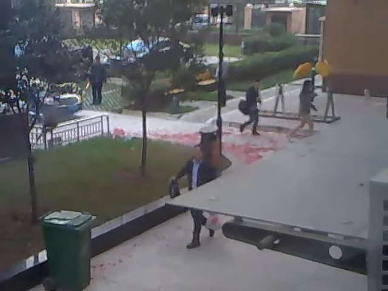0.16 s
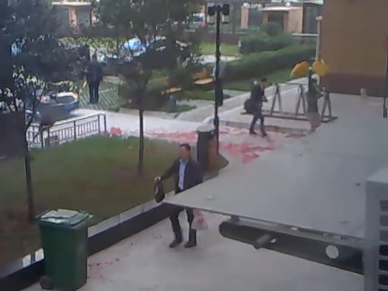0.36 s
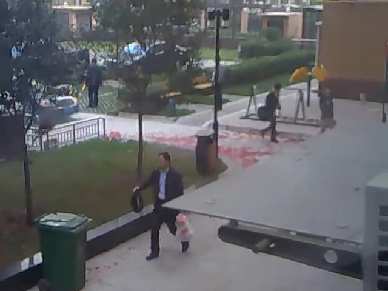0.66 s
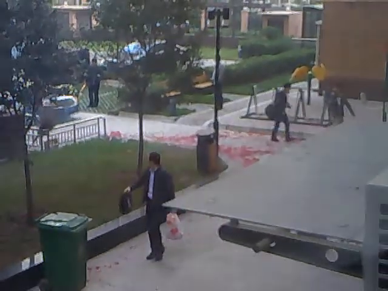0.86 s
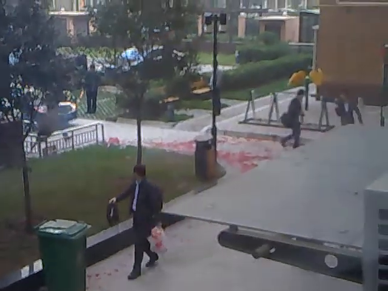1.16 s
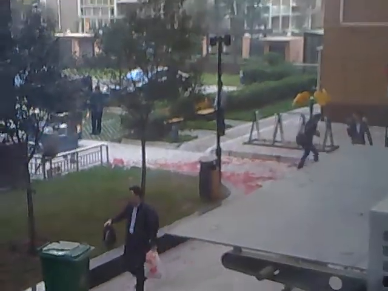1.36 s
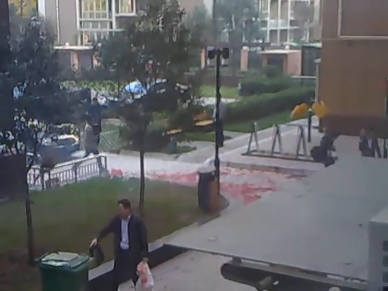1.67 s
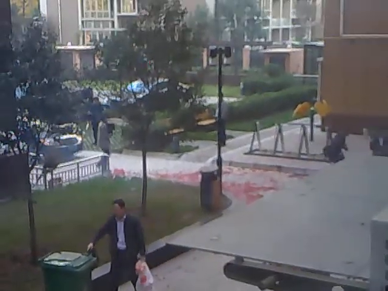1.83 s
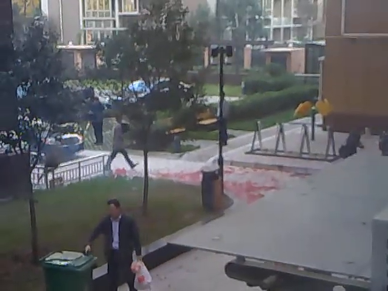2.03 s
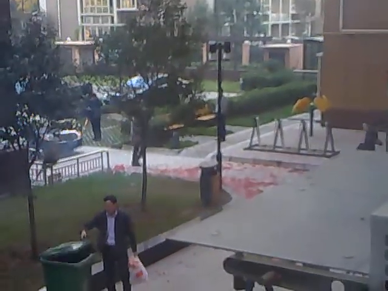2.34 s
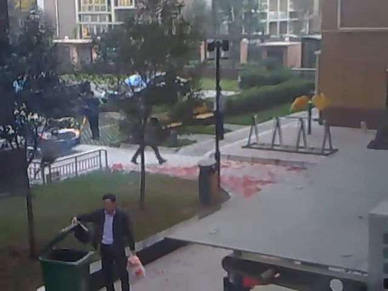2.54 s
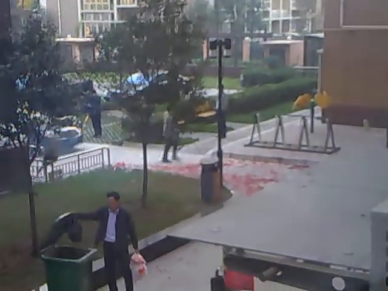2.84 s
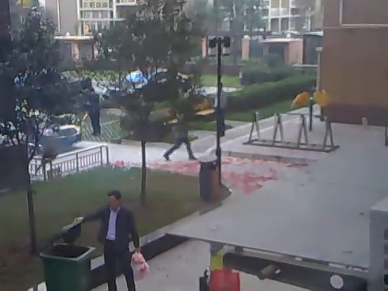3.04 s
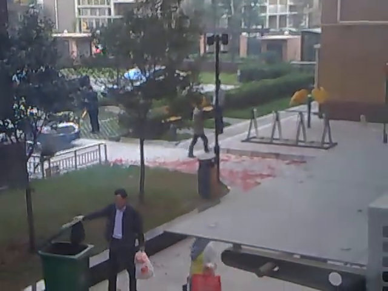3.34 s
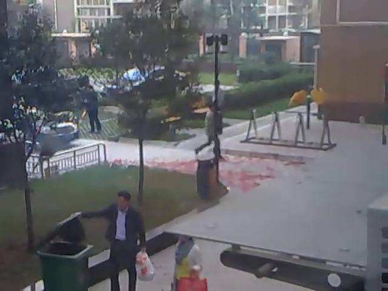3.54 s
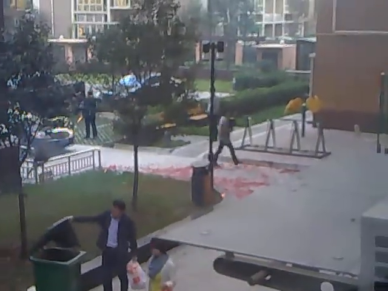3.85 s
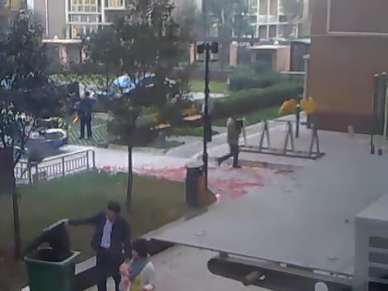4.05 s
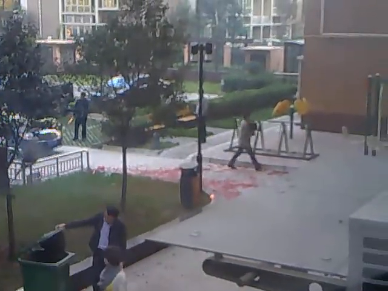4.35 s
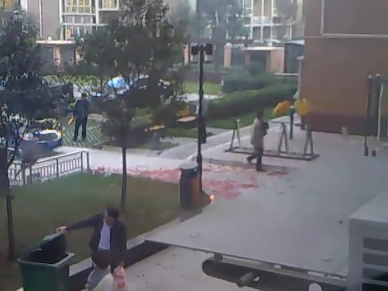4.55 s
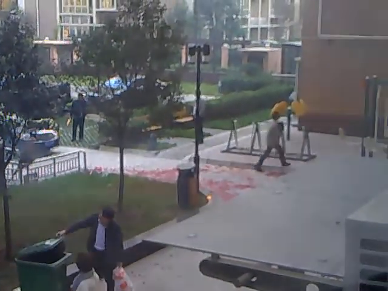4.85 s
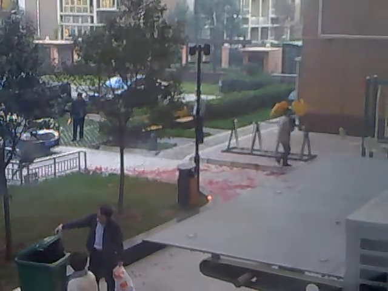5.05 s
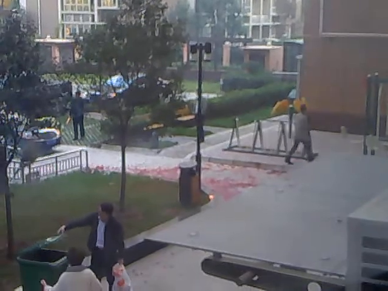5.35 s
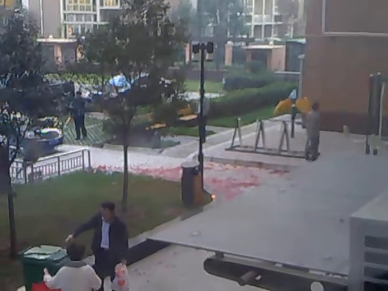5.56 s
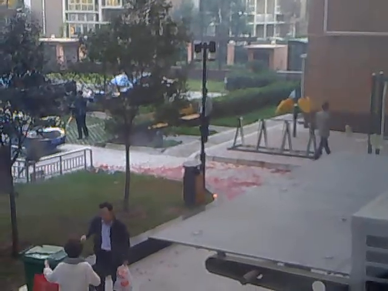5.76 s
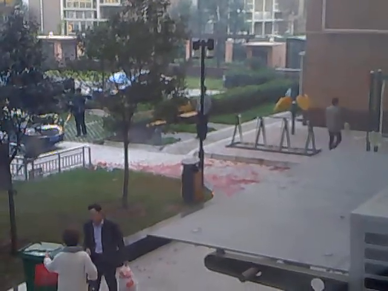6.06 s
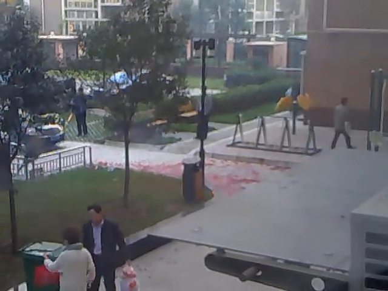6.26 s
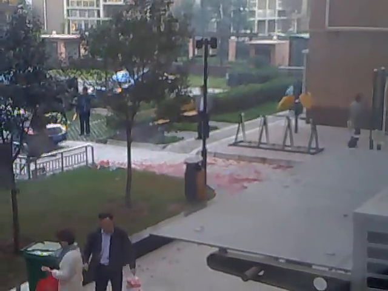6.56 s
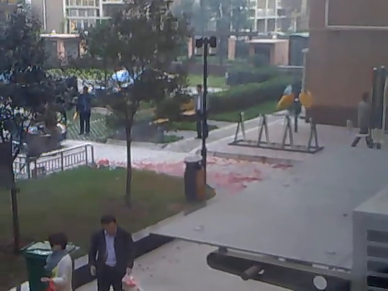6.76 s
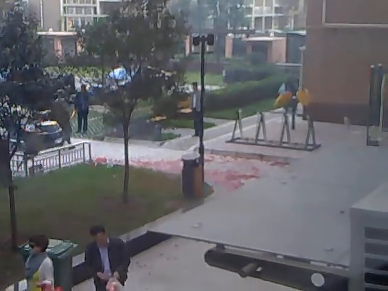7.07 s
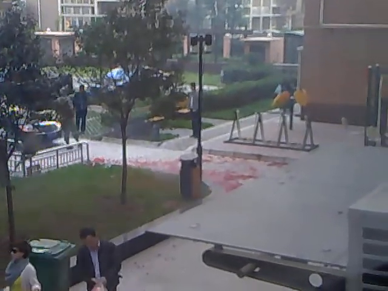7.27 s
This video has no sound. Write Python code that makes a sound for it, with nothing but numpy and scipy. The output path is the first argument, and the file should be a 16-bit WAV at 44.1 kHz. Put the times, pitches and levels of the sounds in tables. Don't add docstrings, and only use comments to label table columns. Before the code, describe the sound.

Two huge firecrackers explode in a hard-walled courtyard, each with crackling slapback echoes and a long fading roar, then a bin lid rattles close by.

```python
import sys
import numpy as np
from scipy import signal
from scipy.io import wavfile
from scipy.ndimage import uniform_filter1d

SR = 44100
rng = np.random.default_rng(int(sys.argv[2]) if len(sys.argv) > 2 else 0)


def transcribe(signal):
    frames = np.atleast_2d(signal).T
    limited = np.clip(frames, -1, 1)
    pcm = np.round(limited * 32767).astype(np.int16)
    wavfile.write(sys.argv[1], SR, pcm)


def volts_from_decibels(level):
    exponent = np.asarray(level, float) / 20
    return 10 ** exponent


N = 326340


def evened(x):
    return x / np.sqrt(np.mean(x ** 2) + 1e-20)


def read(points, hz):
    f, value = np.transpose(points)
    return np.interp(np.log(hz + 1), np.log(f + 1), value)


def add(mix, s, sound):
    part = mix[round(s * SR):][:len(sound)]
    part += sound[:len(part)]


def causal(points, tilt_db=0, size=4096):
    hz = abs(np.fft.fftfreq(size, 1 / SR))
    octaves_up = np.clip(np.log2(hz / 2000 + 1e-9), 0, 2)
    log_gain = np.log(volts_from_decibels(np.maximum(read(points, hz) + tilt_db * octaves_up, -100)))
    h = np.fft.ifft(np.exp(np.conj(signal.hilbert(log_gain)))).real[:size // 2]
    return h / abs(h).max()


def noise(points, count, patchy_db, flicker_db, colour_db=None, size=512):
    hop = size // 4
    frames, hz = count // hop + 5, np.fft.rfftfreq(size, 1 / SR)
    a, b, patches = rng.standard_normal((frames, len(hz), 3)).T
    patches = uniform_filter1d(patches, size=5, axis=0)
    patches = evened(uniform_filter1d(patches, size=12, axis=1))
    flicker = evened(uniform_filter1d(rng.standard_normal(frames), size=3))
    z = (a + 1j * b) * volts_from_decibels(read(points, hz)[:, None] + patchy_db * patches + flicker_db * flicker)
    level = np.sqrt(np.mean(signal.istft(z, nperseg=size, noverlap=size - hop)[1] ** 2))
    if colour_db:
        z = z * volts_from_decibels(colour_db(hz[:, None], np.arange(frames) * hop / SR))
    return signal.istft(z, nperseg=size, noverlap=size - hop)[1][:count] / level


# frequency in Hz, level in dB.
BLAST = [(24, -76.5), (45, -41.5), (140, -17.5), (175, -11), (300, -7.5), (410, -4.5), (480, -10), (680, 1),
         (1010, -2), (1540, -0.5), (2030, -9), (4400, -30), (6100, -46.5), (8200, -66), (15700, -83)]
# start in seconds, blast level in dB, stretch of the echo paths as a factor,
# share of the echo loss from 0 to 1.
BANGS = [
    (1.1658, -3, 1.0, 1.0),
    (3.8232, -3, 1.062, .55),
]
# delay in seconds, dB relative to the blast.
WALLS = [(0, 0), (.0039, -9), (.0097, -1), (.0137, -6), (.0307, -8), (.0492, -2), (.0567, -6), (.0600, -6),
         (.0642, -4), (.1292, -6), (.1852, -9)]
# start in seconds, peak in dB.
STRAYS = [
    (2.012, -38),
    (2.11, -44),
    (2.32, -58),
    (3.8435, -5),
    (3.8995, -5),
    (3.921, -5),
]


def slaps():
    bright_db, dull_db, dull_s = 2, 7, .08
    thump_hz, thump_db = 205, -20.5
    out, t = np.zeros(N), np.arange(400) / SR
    port_rise = np.sin(np.pi / 2 * np.minimum(t / .0012, 1)) ** 2
    port = 3 * port_rise * volts_from_decibels(-60 * t / .014) * np.sin(2 * np.pi * 1400 * t)
    thump = volts_from_decibels(thump_db) * np.sin(2 * np.pi * thump_hz * t) * np.sin(np.pi * t / t[-1])
    fade = np.cos(np.linspace(0, np.pi / 2, 900))
    rows = [(s + stretch * delay, db + share * loss_db, delay)
            for s, db, stretch, share in BANGS for delay, loss_db in WALLS]
    rows += [(s, db, dull_s) for s, db in STRAYS]
    for (s, db, delay), scatter in zip(rows, rng.standard_normal((len(rows), len(t)))):
        fronts = scatter * np.minimum(t / .001, 1) * volts_from_decibels(-60 * t / .012)
        tilt_db = bright_db - dull_db * delay / (delay + dull_s) - 2
        slap = evened(signal.fftconvolve(fronts, causal(BLAST, tilt_db))[:900]) * fade
        slap[:len(t)] += 6.5 * port
        slap[:len(t)] += abs(slap).max() * thump
        add(out, s, volts_from_decibels(db - 1) * slap / abs(slap).max())
    return out


# frequency in Hz, dB after a second.
LOSS = [(60, 2.5), (200, 10), (500, 2.5), (1500, -2.5), (2100, 15.5), (3000, 13), (4200, 26.5),
        (6000, 19.5), (14000, 24.5)]
# frequency in Hz, level in dB.
SPARKLE = [(2000, 0.4), (3000, 5), (4200, 7.5), (6000, 25.5), (8500, 29), (15000, 18.5)]


def roar_colour(hz, age, boom_db, fading):
    most_loss_db, loss_power, crack_db, crack_s = 27, 1.6, 6.5, 0.017
    bass = 1 / (1 + (hz / 200) ** 3)
    sparkle = read(SPARKLE, hz) * np.exp(-age / 0.097)
    loss = most_loss_db * np.tanh(read(LOSS, hz) * fading * age ** loss_power / most_loss_db)
    crack = crack_db * np.exp(-age / crack_s) / (1 + (9000 / (hz + 1)) ** 4)
    return sparkle - loss + crack + bass * (boom_db + 3 * np.exp(-age / .08))


# level in dB, hold in seconds, decay in dB per second, length in seconds.
ROAR = [
    (-17.5, 0.088, 36, 1.2),
    (-13, 0.14, 32, 1.78),
]
# bass below 200 Hz in dB, dulling speed as a factor on the loss,
# seconds after which the suppressor bites.
ROAR_COLOUR = [
    (.5, 1, 0.82),
    (2.5, .6, 1.36),
]
LULL_DB = [5.5, 1.5]


def roars():
    far_wall_s, bite_db_per_s = .049, 18.5
    out = np.zeros(N)
    for (s, *_), (db, hold, fall, length), (boom_db, fading, bite), lull_db in zip(
            BANGS, ROAR, ROAR_COLOUR, LULL_DB):
        t = np.arange(0, length, 1 / SR)
        echoes = noise(BLAST, count=len(t), patchy_db=1.1, flicker_db=1.1, size=1024,
                       colour_db=lambda hz, age: roar_colour(hz, age, boom_db, fading))
        lull = np.interp(t / far_wall_s, [0, .35, .9, 1.05], [-.3, .8, 1, 0])
        knee = np.hypot(t - hold, .05) + t - hold
        level_db = db - lull_db * lull - fall * knee / 2 - bite_db_per_s * np.maximum(t - bite, 0)
        ends = np.minimum(1, np.minimum(t / .003, (length - t) / .1))
        add(out, s + .001, volts_from_decibels(level_db) * echoes * ends)
    return out


# start in seconds, time to the main crest in seconds, level in dB.
KNOCK = (.3076, .0023, -7)


def knock():
    s, crest, db = KNOCK
    u = np.arange(1, 1800) / SR / crest
    swing = np.cos(2 * np.pi * np.log2(u))
    swing = swing * u ** 1.5 * np.exp(-(u / 1.4) ** 4) * np.minimum(u / .24, 1) ** 4
    push = .6 * np.exp(-((u - 1) / .25) ** 2)
    creep = -.15 * np.exp(-((u - 2.3) / .75) ** 4) + .03 * np.exp(-((u - 5.8) / 2.5) ** 2)
    motion = uniform_filter1d(swing + push + creep, size=4)
    out = np.zeros(N)
    add(out, s, volts_from_decibels(db) * signal.lfilter(*signal.iirnotch(3180, 6, SR), motion))
    return out


# start in seconds, peak in dB,
# frequency in Hz, length in cycles, hollow overtone in relative dB.
BUMPS = [(0.004, -57, 240, 1.5, -16), (0.268, -45.5, 95.5, 0.71, -8), (0.379, -51, 251, 3.5, -18),
         (0.488, -52.5, 180, 0.84, -5.5), (0.829, -72.5, 62, 1.4, -13.5), (0.874, -68.5, 61.9, 1.4, -10),
         (2.929, -56, 102.5, 0.78, -17.5), (3.08, -50.5, 180, 1.7, -14.5), (3.531, -36.5, 56, 1, -3),
         (5.452, -47.5, 172.6, 1.8, -12), (5.71, -50, 185, 1.1, -6), (6.038, -40.5, 154, 1.7, -2.5),
         (6.309, -42.5, 117, 3.3, -21), (6.479, -38.5, 183, 1.9, -20), (6.745, -44.5, 210, 1.7, 5),
         (6.829, -39, 214, 1.6, -10), (7.127, -34, 100, 0.96, -19), (7.238, -38.5, 194, 0.79, -6.5)]
THUDS = [
    (.646, -50, 75, 1.1, -4),
    (.648, -54, 220, 1.2, -20),
    (6.008, -40, 62, 1.1, -7),
    (6.02, -45, 260, 2.5, -6),
    (5.41, -57, 180, 9, -30),
]
# frequency in Hz, t60 in seconds.
HOLLOW = (440, .04)


def bumps():
    out, t = np.zeros(N), np.arange(9000) / SR
    hollow_hz, hollow_t60 = HOLLOW
    hollow = np.minimum(t / .008, 1) * volts_from_decibels(-60 * t / hollow_t60) * np.sin(2 * np.pi * hollow_hz * t)
    for s, db, hz, cycles, hollow_db in list(BUMPS) + list(THUDS):
        u = t * hz / cycles
        bump = 5.4 * u * np.exp(-2 * u) * np.sin(2 * np.pi * hz * t)
        add(out, s, volts_from_decibels(db) * (bump + volts_from_decibels(hollow_db + 6) * hollow))
    return out


# start in seconds, peak in dB, t60 in seconds.
RATTLES = [(2.9628, -56, 0.1), (3.5399, -54, 0.13), (5.6333, -55, 0.24), (5.6977, -34, 0.11),
           (5.711, -39, 0.08), (5.7658, -26.5, 0.18), (5.8005, -52, 0.18), (5.831, -43, 0.52),
           (5.9412, -48.5, 0.71), (6.0873, -45.5, 0.21), (6.1133, -68, 0.19), (6.2556, -57, 0.13),
           (6.2984, -56, 0.24), (6.41, -56, 0.11), (6.7064, -47, 0.14), (6.7515, -42, 0.15),
           (6.818, -42, 0.35), (7.1566, -63, 0.12), (7.2961, -33, 0.042)]
# frequency in Hz, level in dB.
RATTLE = [(180, -44.5), (300, -6), (434, -16), (937, -3.5), (1060, -11), (1240, 2.5), (1910, -12),
          (2840, -23.5), (4000, -25), (9000, -43), (11700, -83), (19800, -120)]
# start in seconds, level in dB.
TICKS = [
    (2.966, -77),
    (3.14, -79),
    (6.112, -66),
    (6.252, -63),
]


def rattles():
    out, t = np.zeros(N), np.arange(9000) / SR
    for (s, db, t60), grit in zip(RATTLES, rng.standard_normal((len(RATTLES), len(t)))):
        shake = evened(signal.fftconvolve(grit, causal(RATTLE, -8))[:len(t)])
        add(out, s, volts_from_decibels(db - 10 - 60 * t / t60) * np.minimum(t / 0.0053, 1) ** 1.4 * shake)
    for (s, db), grit in zip(TICKS, rng.standard_normal((len(TICKS), len(t)))):
        crackle = evened(signal.lfilter(*signal.iirpeak(2500, 3.5, SR), grit))
        add(out, s, volts_from_decibels(db - 60 * t / .11) * np.minimum(t / 0.0046, 1) * crackle)
    return out


# start in seconds, end in seconds, pitch in Hz, lowest multiple,
# highest multiple, level in dB.
DRONES = [
    (.93, 1.17, 229, 3, 7, -78),
    (3.45, 3.8, 549, 1, 2, -50.5),
    (3.62, 3.72, 1610, 1, 1, -56),
    (7.3, 7.4, 865, 1, 1, -59),
]


def drones():
    out = np.zeros(N)
    for start, end, hz, low, high, db in DRONES:
        t = np.arange(0, end - start, 1 / SR)
        drift, waver = uniform_filter1d(rng.standard_normal((2, len(t))), size=1200, axis=1)
        turns = hz * (t + .00008 * evened(drift))
        multiples = range(round(low), round(high) + 1)
        hum = sum(np.sin(2 * np.pi * k * turns + k * k) / np.sqrt(k) for k in multiples)
        add(out, start, volts_from_decibels(db + 2.5 * evened(waver)) * hum * signal.windows.tukey(len(t), .6))
    return out


# frequency in Hz, width in Hz, share.
RECESS = [(182.3, 4, 1), (234, 4.9, 0.23), (323, 27, 0.37), (713.3, 19, 0.45), (1166, 14, 0.76),
          (1226, 14, 0.93), (1710, 30, 0.25), (1787, 41, 0.62)]


def recess(x):
    out = x.copy()
    for hz, width, share in RECESS:
        out += share * signal.lfilter(*signal.iirpeak(hz, hz / width, SR), x)
    return out


# time in seconds, gain in dB.
GATE = [(0, -24), (1.0, -29.5), (1.14, -28), (1.17, -6), (1.42, -22), (2.1, -36.5), (2.6, -56), (2.84, -30),
        (3.71, 1), (3.9, 4.2), (4.12, -9), (4.37, -12.5), (5.05, -16), (5.59, -25), (6.43, -0.06),
        (7.4, -1)]
OPEN_DB = {"circuit": -72, "rumble": -48, "street": -53.5}


def suppressor_db(t):
    return np.interp(t, *np.transpose(GATE))


# frequency in Hz, level in dB.
RUMBLE = [(8.8, -32.5), (15, -10), (54, -4), (86, 0), (150, -7.5), (190, -2), (313, -10), (458, -17.5),
          (500, -16.5), (650, -53), (1100, -120)]
# frequency in Hz, level in dB.
STREET = [(180, -28), (300, -10.5), (459, -11.5), (589, -9), (708, -1), (1050, -7), (1230, -4),
          (1740, -11.5), (2020, -30), (2200, -30), (2860, -48), (4840, -120)]
SHUT_DB = {"rumble": -76, "street": -92.5}
FOLLOW = {"rumble": 1.2, "street": 1.1}
# crest in seconds, rise in seconds, fall in seconds,
# rumble level in dB, street level in dB.
SWELLS = [(.01, .05, .2, -70, -71.5), (.12, 0.12, 0.18, -66, -87), (.27, .04, .12, -63, -70.5),
          (0.361, 0.058, 0.15, -56, -72), (1.099, .1, 0.11, -78, -73), (3.1, 0.37, 0.47, -68.5, -66),
          (3.3, 0.25, 0.24, -57.5, -64.5), (3.6, 0.23, .4, -53.5, -47.5), (5.448, 0.069, 0.16, -61.5, -74),
          (5.748, .05, 0.49, -53.5, -62), (5.92, 0.29, 1, -58, -60), (6.13, 0.027, 0.4, -54, -69),
          (6.5, 0.36, 0.54, -53, -55.5)]


def rumble_and_street():
    afterglow_db, afterglow_db_per_s, afterglow_life_s = -56, 8.5, 1.9
    t = np.arange(N) / SR
    gate_db = suppressor_db(t)
    power = {k: volts_from_decibels(OPEN_DB[k] + FOLLOW[k] * gate_db) ** 2 + volts_from_decibels(SHUT_DB[k]) ** 2 for k in SHUT_DB}
    for s, rise, fall, rumble_db, street_db in SWELLS:
        swell = np.exp(-4 * ((t - s) / np.where(t < s, rise, fall)) ** 2)
        power["rumble"] += volts_from_decibels(rumble_db) ** 2 * swell
        power["street"] += volts_from_decibels(street_db) ** 2 * swell
    for s, *_ in BANGS:
        age = t - s
        murmur = volts_from_decibels(afterglow_db - afterglow_db_per_s * age) ** 2
        power["street"] += (age > 0) * murmur / (1 + (age / afterglow_life_s) ** 10)
    rumble = noise(RUMBLE, count=N, patchy_db=1.6, flicker_db=1.8, size=2048)
    street = noise(STREET, count=N, patchy_db=1.4, flicker_db=1.1)
    return np.sqrt(power["rumble"]) * rumble + np.sqrt(power["street"]) * street


# first line in Hz, number of lines, level in dB, dB a step.
COMBS = [(4501, 6, -91, .5), (4915, 2, -88, 7), (6691, 1, -89, 0), (8468, 2, -93, 3), (9835, 2, -87, -2),
         (11612, 1, -80, 0), (12500, 4, -84, -1.5), (9421, 2, -92, 2), (11197, 6, -85, -.2),
         (10250, 3, -88, -1), (15224, 1, -90, 0)]
# frequency in Hz, then levels in dB from two sidebands below to three above.
CARRIER = (10869, [-88, -85, -75, -76, -86, -90])


def whine():
    comb_hz, side_hz = 888.2, 59.2
    lines = [(hz + k * comb_hz, db + k * step_db) for hz, count, db, step_db in COMBS for k in range(count)]
    lines += [(CARRIER[0] + (k - 2) * side_hz, db) for k, db in enumerate(CARRIER[1])]
    drift = uniform_filter1d(uniform_filter1d(rng.standard_normal(N), size=6000), size=6000)
    t = np.arange(N) / SR + 4e-6 * evened(drift)
    return sum(volts_from_decibels(db + 76) * np.sin(2 * np.pi * (hz * t + rng.random())) for hz, db in lines)


# frequency in Hz, level in dB.
HISS = [(1180, -30.5), (2000, 2), (3790, -5.5), (5990, -7.5), (8530, -14.5), (9380, -13.5), (11200, -9),
        (12100, -12), (15700, -14)]


def circuit():
    hiss = volts_from_decibels(6.5) * noise(HISS, count=N, patchy_db=2.0, flicker_db=1.0)
    opening = volts_from_decibels(OPEN_DB["circuit"] + suppressor_db(np.arange(N) / SR))
    return opening * (hiss + whine()) + volts_from_decibels(-93.5) * rng.standard_normal(N)


def scene():
    bangs = slaps() + roars()
    yard = bangs + bumps() + rattles() + drones() + rumble_and_street()
    return (recess(yard) + knock() + circuit())[None]


def band_limit(x):
    return signal.sosfilt(signal.butter(12, 15730, fs=SR, output="sos"), x)


def record(dry):
    limit, splatter = .68, 0.5
    squashed = dry / (1 + abs(dry / limit) ** 6) ** (1 / 6)
    lowpass = signal.butter(4, 4000, fs=SR, output="sos")
    smooth = dry + signal.sosfiltfilt(lowpass, squashed - dry)
    mix = splatter * squashed + (1 - splatter) * smooth
    return band_limit(mix)


dry = scene()
out = record(dry)
transcribe(out)
```